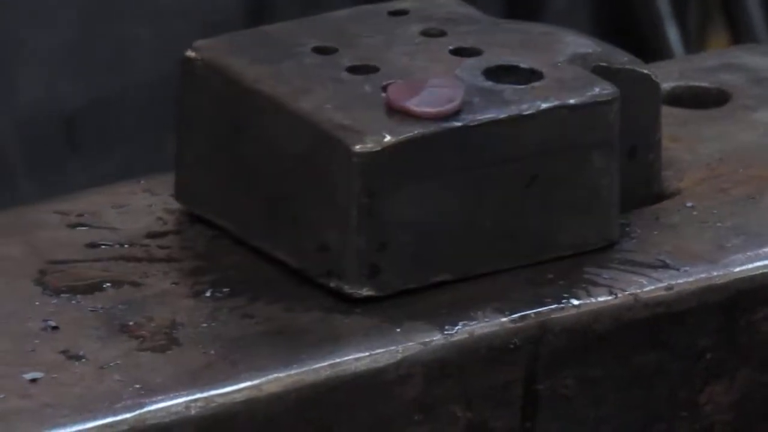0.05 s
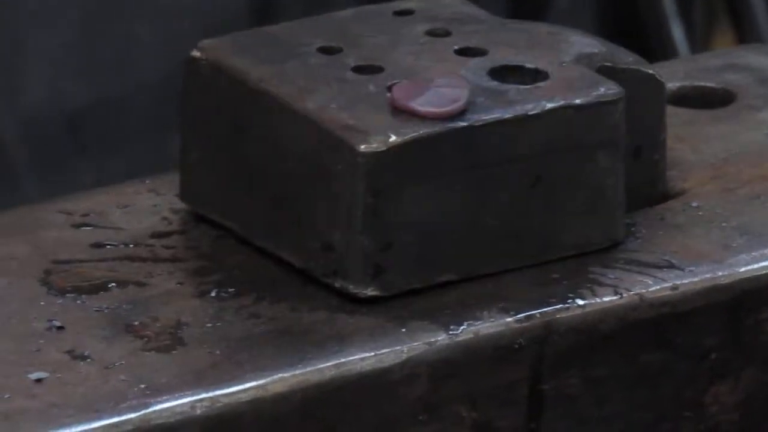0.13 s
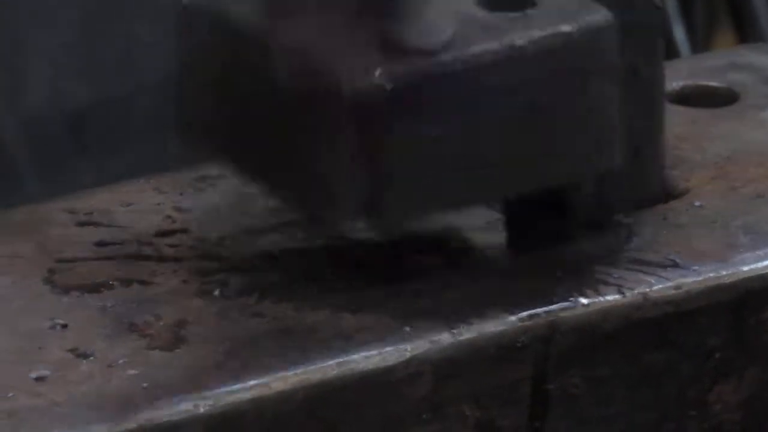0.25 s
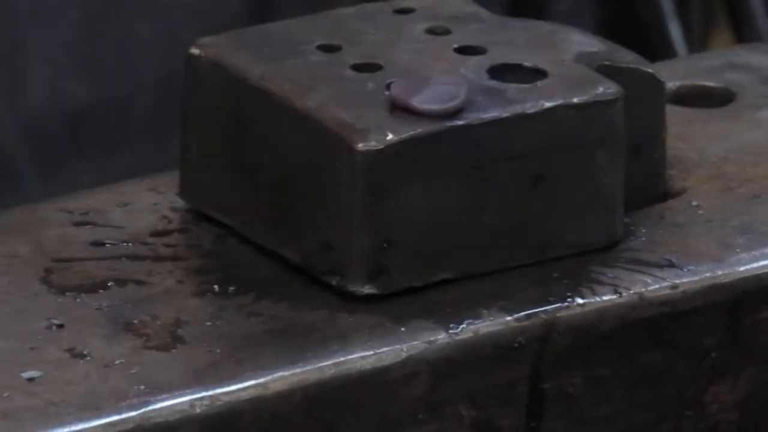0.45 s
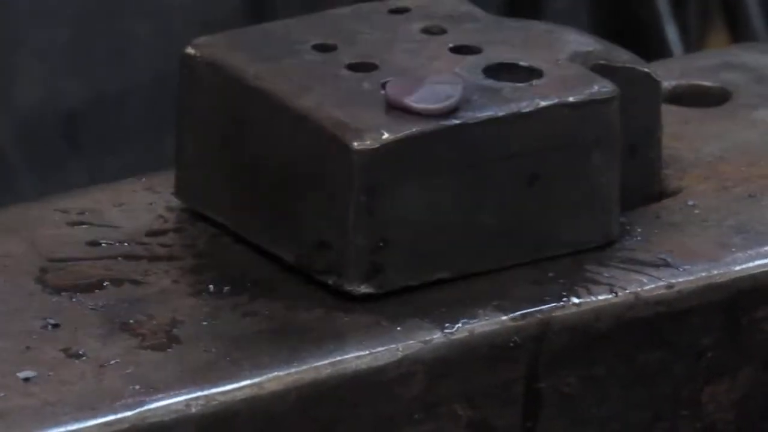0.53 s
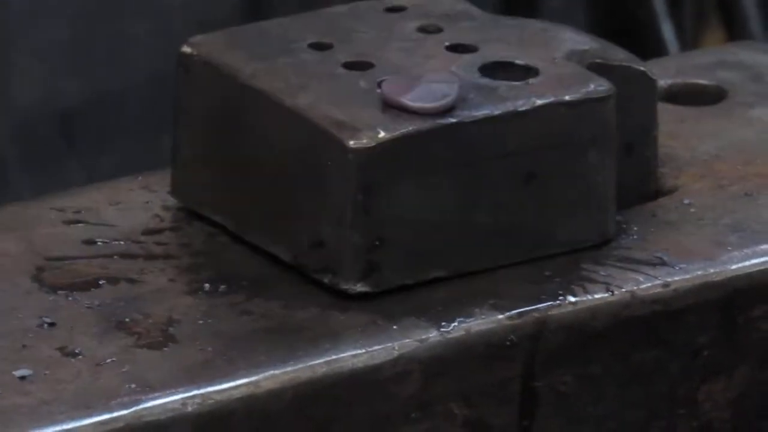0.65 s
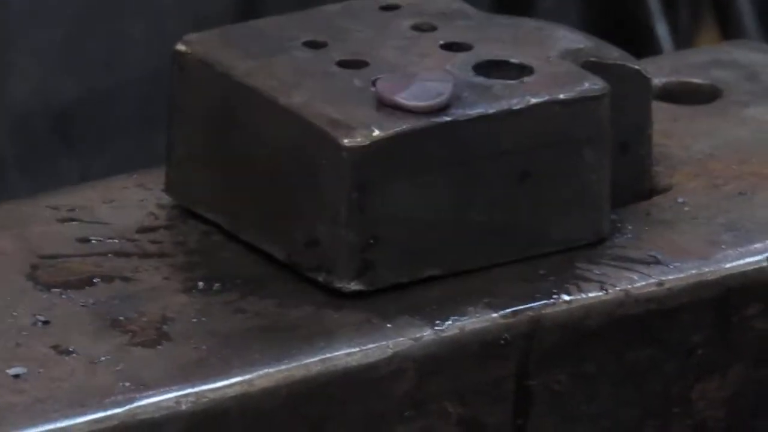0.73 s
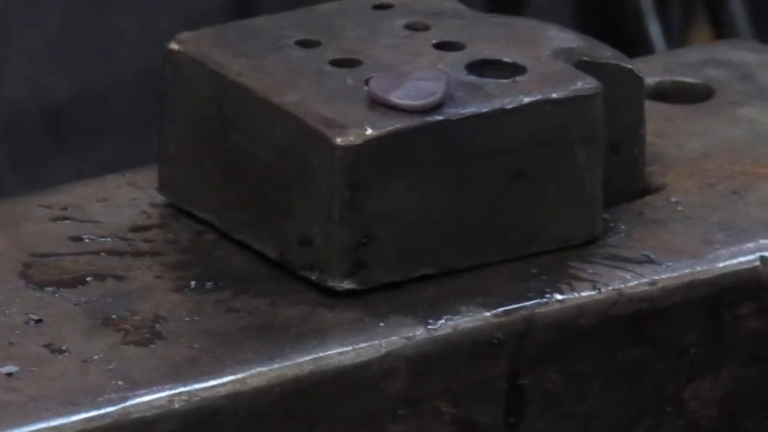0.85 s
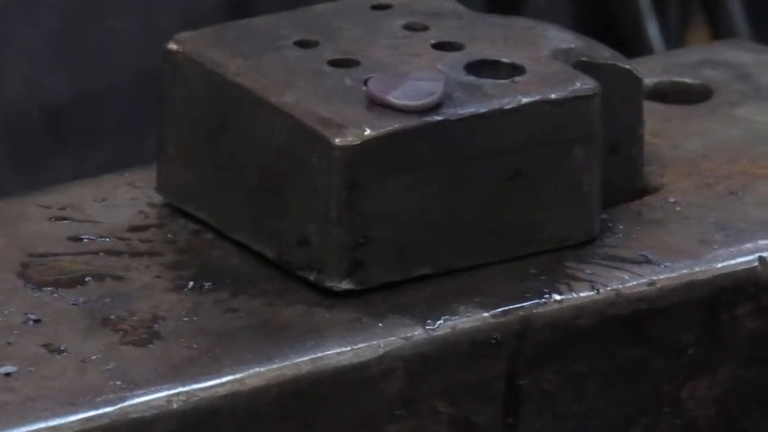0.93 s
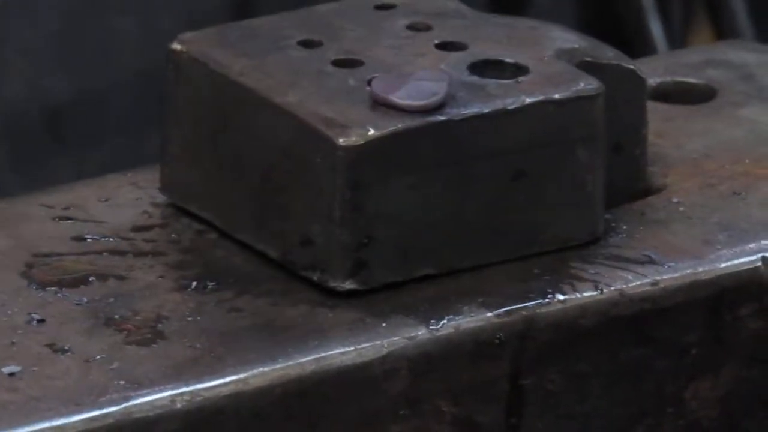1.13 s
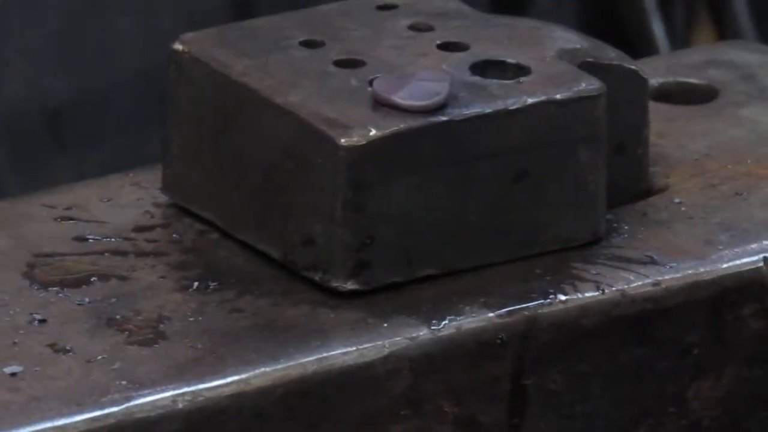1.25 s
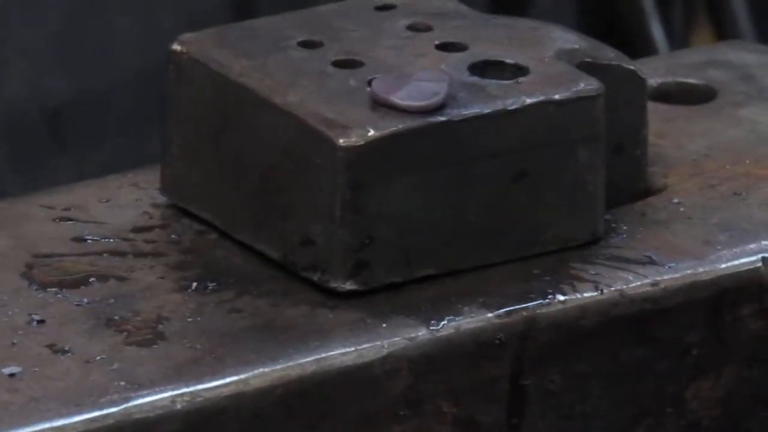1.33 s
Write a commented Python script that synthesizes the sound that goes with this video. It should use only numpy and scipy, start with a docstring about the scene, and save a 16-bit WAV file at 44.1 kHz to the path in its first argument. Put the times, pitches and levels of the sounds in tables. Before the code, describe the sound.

One loud ringing hammer blow on a steel block, followed by a light double clink.

```python
"""Small workshop. A hammer hits a steel block on an anvil: a contact crack, a thud and a loud ring.
A light double clink follows, its ring damped by the resting hammer. The ring is decaying sine modes
over a noise clang of weaker modes and reverberation; cracks and thud are short noise bursts.
Behind: faint ring from an earlier tap, far machinery hum, air noise, two soft knocks."""
import sys
import numpy as np
from scipy import signal
from scipy.fft import irfft
from scipy.io import wavfile

SR = 44100
rng = np.random.default_rng(int(sys.argv[2]) if len(sys.argv) > 2 else 0)


def transcribe(u):
    """Save the signal u as a 16-bit wav file named by the first command-line argument.

    u: samples, shape (n,) or (channels, n), limited to [-1, 1]; the rate is SR.
    q: integer samples, one column per channel.
    """
    v = np.clip(np.atleast_2d(u).T, -1, 1)
    q = np.round(v * 32767).astype(np.int16)
    wavfile.write(sys.argv[1], SR, q)


N = 61739
TIME_S, BINS_HZ = np.arange(N) / SR, np.fft.rfftfreq(N, 1 / SR)

# air noise spectrum: freq_hz, relative_density_db
AIR_SPECTRUM = [(25, -44), (50, -11), (100, -13), (230, -5.5), (400, -12), (800, -10), (1500, -16),
                (2400, -19.5), (4000, -22.5), (8500, -27), (12500, -31.5), (15000, -50)]
# air noise envelope: time_s, level_db
AIR_ENVELOPE = [(0, -49.5), (.75, -54), (1.1, -52), (1.4, -51.5)]
# machinery hum: pitch_hz, first_db, last_db
HUM_PARTIALS = [(55.4, -72, -70), (89, -61, -67.5), (122, -63.5, -67), (154.5, -66, -68), (178, -83, -54.5),
                (231, -49.5, -65.5), (239, -65, -62.5), (339.5, -54, -67), (436, -76, -61.5),
                (565, -63.5, -77), (692, -73, -66), (877, -66.5, -66.5)]
# background knocks: start_s, level_db
SOFT_KNOCKS = [(1.295, -47), (1.375, -46)]
# modes still ringing from an earlier tap: pitch_hz, initial_db
LINGERING_MODES = [(1437, -52), (1884, -50.5), (2768, -54.5), (3128, -53), (3768, -44.5), (5226, -52.5),
                   (8281, -72)]
# crowded weak modes in the room: freq_hz, heavy_relative_db, clink_relative_db, t60_s
CLANG_BANDS = [(29.8, -24, -42, .6), (79, -10, -29, 0.66), (130, -1.5, -12, 0.57), (235, 3, -12, 0.7),
               (440, -8.5, -11, 0.75), (640, -10, -13.5, 0.82), (1050, -2.5, -0.5, 0.57),
               (1360, -0.5, 1, 0.71), (1650, -1, -4, 0.7), (2090, 5.5, 1, 0.78), (2450, -2, -3, 0.68),
               (2850, 2.5, 3.5, 0.68), (3450, -3.5, -0.5, 0.66), (4300, -2, 2.5, 0.58),
               (6530, -3.5, -10.5, .55), (7740, -4.5, -17, .52), (7720, -4, -23, .5),
               (8230, -0.5, -23, 0.64), (8900, -11, -25, 0.42), (9440, -6, -14, 0.57),
               (10400, -2, -17, 0.45), (10850, -14, -23, .44), (11400, -12, -23, .42),
               (12000, -7, -27, 0.56), (12700, -21, -30, 0.43), (13600, -15, -35, .3),
               (14900, -18, -22, .33)]
# steel modes: pitch_hz -> t60_s, heavy_db, clink_db
STEEL_MODES = {1437: (0.76, -32, -46), 1675: (0.59, -22.5, -55), 1884: (0.68, -24, -64),
               1973: (0.22, -40, -69), 2007: (.28, -21.5, -65), 2126: (0.62, -24.5, -65),
               2751: (0.59, -21.5, -61), 2768: (0.71, -26.5, -71), 2865: (0.68, -29.5, -43.5),
               3128: (0.66, -39, -45), 3768: (1.28, -35, -45), 4034: (0.47, -22, -48),
               4431: (0.56, -22, -61), 4448: (0.71, -30.5, -66), 4864: (.55, -33, -49),
               5226: (0.62, -25, -38), 5888: (0.32, -31, -47), 6089: (0.6, -25.5, -39),
               6426: (0.7, -35, -51), 6594: (0.45, -30.5, -68), 6707: (0.58, -35.5, -42),
               7151: (0.32, -32, -51), 7246: (0.38, -32, -59), 8281: (0.92, -26.5, -39.5),
               8374: (.54, -26, -72), 9525: (0.53, -33.5, -77), 9695: (0.37, -49, -51.5),
               10104: (0.3, -26, -66), 10172: (0.35, -28, -73), 10325: (0.27, -27, -69),
               10546: (0.68, -46, -59), 11041: (0.57, -33, -67), 11166: (0.64, -29, -58),
               11563: (.47, -37, -73), 11944: (.35, -29.5, -80), 12297: (0.59, -42, -68),
               12415: (0.32, -36, -80), 13000: (.43, -47, -86), 13530: (.35, -49, -84),
               13700: (.32, -43, -84)}
# steel-on-steel contacts: start_s, level_db, decay_s, centre_hz, width_oct
STEEL_CONTACTS = [(.2438, -5.5, .0018, 2600, .88), (.2445, -15, .01, 2050, .14),
                  (.2568, -15, .0007, 5300, .4), (.9090, -21.5, .0007, 4200, .53),
                  (.9158, -25, .0007, 3700, .42)]

HEAVY_START_S, CLINK_START_S = 0.2438, 0.9090
HEAVY_RISE_S, CLINK_RISE_S = 0.0037, 0.003  # build-up as reflections arrive
BEAT_DEPTH, BEAT_HZ = 0.32, 13.1  # reflections make each mode beat
ROOM_HOLD_S = 0.077
HAMMER_REST_DB_PER_S = 20.5
STAND_HZ, STAND_DB, STAND_T60_S = 136, -36.5, 0.81


def amp(db):
    """Decibels to gain."""
    return 10 ** (np.asarray(db) / 20)


def log_interp(hz, points_hz, values):
    """Interpolate over log frequency."""
    return np.interp(np.log(hz + 1), np.log(np.asarray(points_hz) + 1), values)


def add(mix, start_s, sound):
    """Mix in place from start_s."""
    part = mix[round(start_s * SR):]
    part += sound[:len(part)]


def noise(bin_gain):
    """Random-phase noise of given spectrum, rms 1."""
    x = irfft(bin_gain * np.exp(2j * np.pi * rng.random(len(BINS_HZ))), N)
    return x / np.sqrt(np.mean(x ** 2) + 1e-20)


def wavering_tone(pitch_hz, depth, waver_hz):
    """Sine with random drift in level and phase."""
    rates_hz = waver_hz * rng.uniform(-0.975, 1, 8)
    coarse_s = TIME_S[::100]
    phasors = np.exp(2j * np.pi * (rates_hz[:, None] * coarse_s + rng.random((8, 1))))
    drift = phasors.sum(0) / np.sqrt(len(rates_hz))
    swing = np.interp(TIME_S, coarse_s, 1 + depth * drift)
    return abs(swing) * np.sin(2 * np.pi * (pitch_hz * TIME_S + rng.random()) + np.angle(swing))


def burst(level_db, decay_s, centre_hz, width_oct):
    """Band-noise impact with the energy of an exponential decay from level_db."""
    decay = np.exp(-TIME_S / decay_s)
    band = np.exp(-0.5 * (np.log2((BINS_HZ + 1) / centre_hz) / width_oct) ** 2)
    puff = noise(band) * decay * (1 - np.exp(-2 * TIME_S * centre_hz))
    return amp(level_db) * puff * np.linalg.norm(decay) / np.linalg.norm(puff)


def workshop():
    """Air noise, wavering hum of far machinery, soft knocks."""
    air_db = np.interp(TIME_S, *np.transpose(AIR_ENVELOPE))
    out = amp(air_db) * noise(amp(log_interp(BINS_HZ, *np.transpose(AIR_SPECTRUM))))
    for pitch_hz, first_db, last_db in HUM_PARTIALS:
        hum = np.sqrt(2) * wavering_tone(pitch_hz, depth=0.25, waver_hz=5.12)
        out += amp(np.linspace(first_db, last_db, N)) * hum
    for start_s, level_db in SOFT_KNOCKS:
        add(out, start_s, burst(level_db, decay_s=0.0068, centre_hz=230, width_oct=0.9))
    return out


def lingering_ring():
    """Tail of an earlier tap; each mode decays at its own rate."""
    out = np.zeros(N)
    for pitch_hz, initial_db in LINGERING_MODES:
        t60_s = STEEL_MODES[pitch_hz][0]
        out += amp(initial_db - 60 * TIME_S / t60_s) * wavering_tone(pitch_hz, BEAT_DEPTH, BEAT_HZ)
    return out


def clang(blow, level_db):
    """Crowded weak modes and their reverberation as noise; treble dies first."""
    bands_hz, heavy_db, clink_db, t60_s = np.transpose(CLANG_BANDS)
    spectrum_db = log_interp(BINS_HZ, bands_hz, heavy_db if blow == "heavy" else clink_db)
    freq_hz, frame_s, frames = signal.stft(noise(amp(spectrum_db)), SR, nperseg=512, noverlap=384)
    decay = amp(-60 * frame_s / log_interp(freq_hz, bands_hz, t60_s)[:, None])
    return amp(level_db) * signal.istft(frames * decay, SR, nperseg=512, noverlap=384)[1][:N]


def steel_ring(blow, damping_db_per_s=0):
    """Steel modes: held briefly by the room, then each decays at its own rate."""
    fading_s = np.hypot(TIME_S, ROOM_HOLD_S) - ROOM_HOLD_S
    out = np.zeros(N)
    for pitch_hz, (t60_s, heavy_db, clink_db) in STEEL_MODES.items():
        initial_db = heavy_db if blow == "heavy" else clink_db
        loss_db = (60 / t60_s + damping_db_per_s) * fading_s
        out += amp(initial_db - loss_db) * wavering_tone(pitch_hz, BEAT_DEPTH, BEAT_HZ)
    return out


def stand_boom():
    """Low mode of the anvil on its stand."""
    return amp(STAND_DB - 60 * TIME_S / STAND_T60_S) * np.sin(2 * np.pi * STAND_HZ * TIME_S)


def hammer():
    """Heavy blow, then light clink: same steel, different mode levels."""
    heavy = steel_ring("heavy") + clang("heavy", level_db=-14) + stand_boom()
    clink = steel_ring("clink", HAMMER_REST_DB_PER_S) + clang("clink", level_db=-35)
    thud = burst(level_db=-12, decay_s=0.0032, centre_hz=790, width_oct=1.24)  # block slams on anvil
    out = np.zeros(N)
    add(out, HEAVY_START_S, heavy * (1 - np.exp(-TIME_S / HEAVY_RISE_S)) + thud)
    add(out, CLINK_START_S, clink * (1 - np.exp(-TIME_S / CLINK_RISE_S)))
    for start_s, level_db, decay_s, centre_hz, width_oct in STEEL_CONTACTS:
        add(out, start_s, burst(level_db, decay_s, centre_hz, width_oct))
    return out


def scene():
    """Mono mix of steel and workshop."""
    return (hammer() + lingering_ring() + workshop())[None]


def record(dry):
    """Clip at full scale, then low-pass at 15 kHz."""
    lowpass = signal.firwin(301, 15000, window=("kaiser", 9), fs=SR)
    return signal.oaconvolve(np.clip(dry, -1, 1), lowpass[None], "same")


dry = scene()
out = record(dry)
transcribe(out)
```